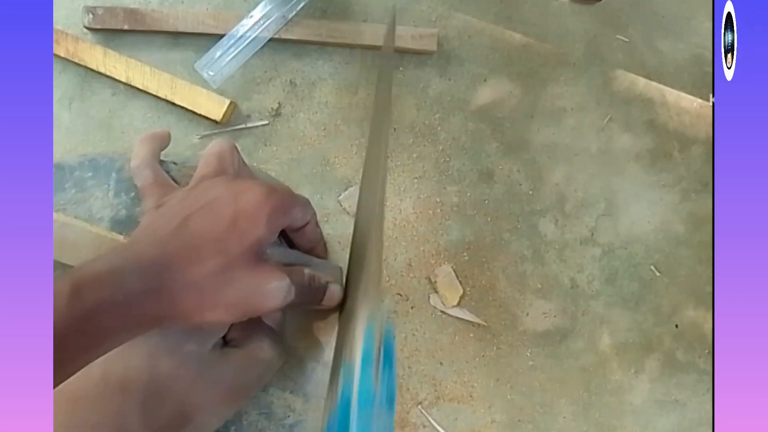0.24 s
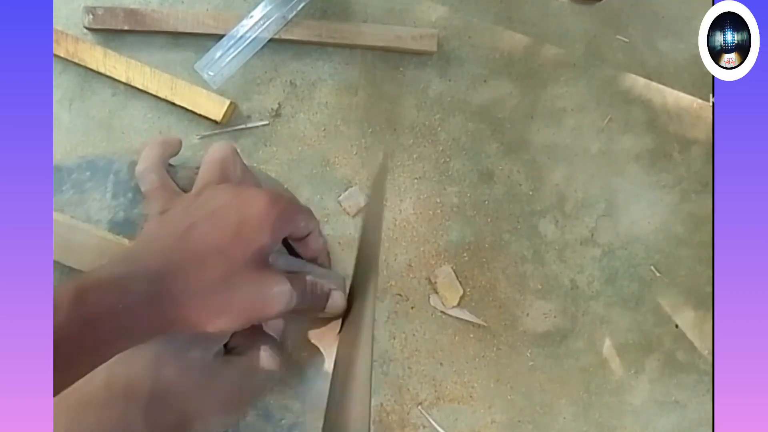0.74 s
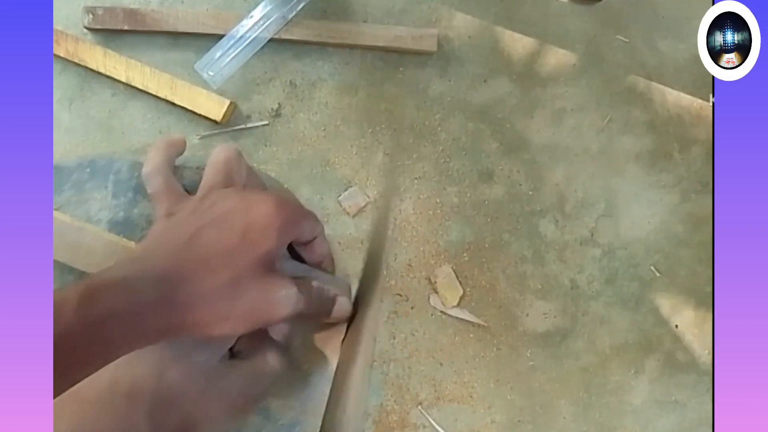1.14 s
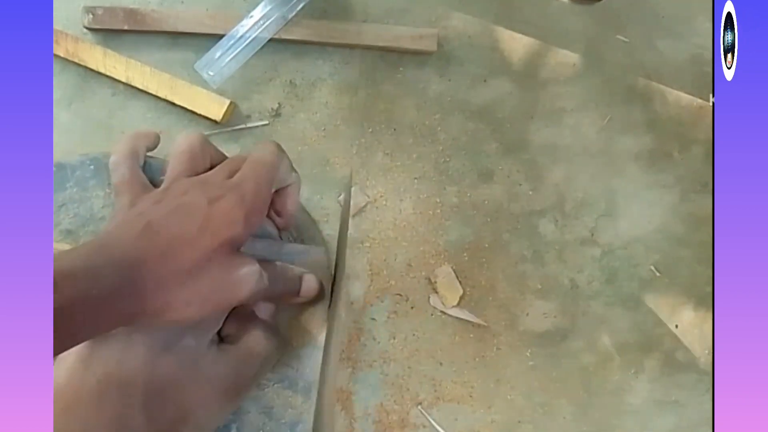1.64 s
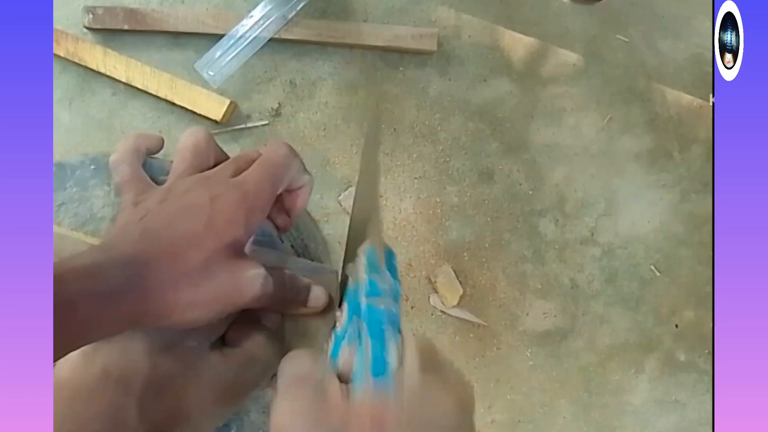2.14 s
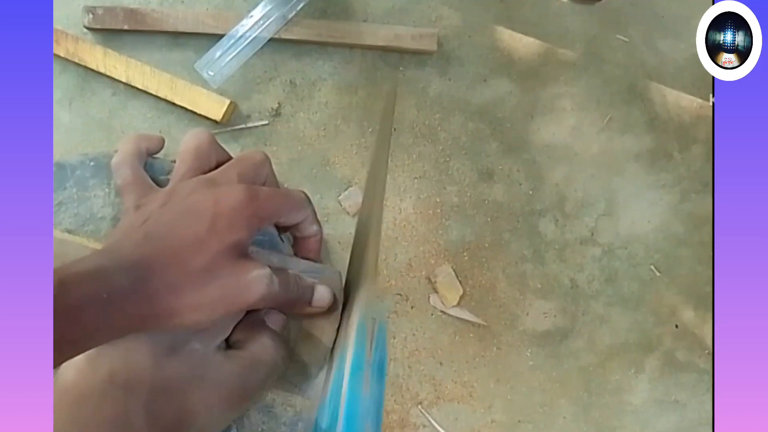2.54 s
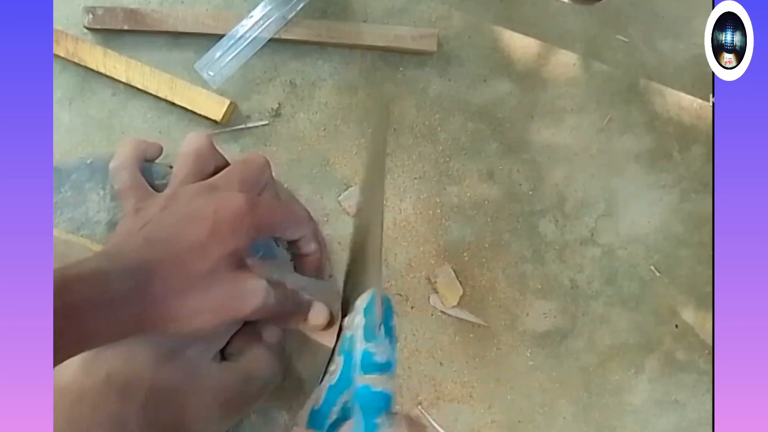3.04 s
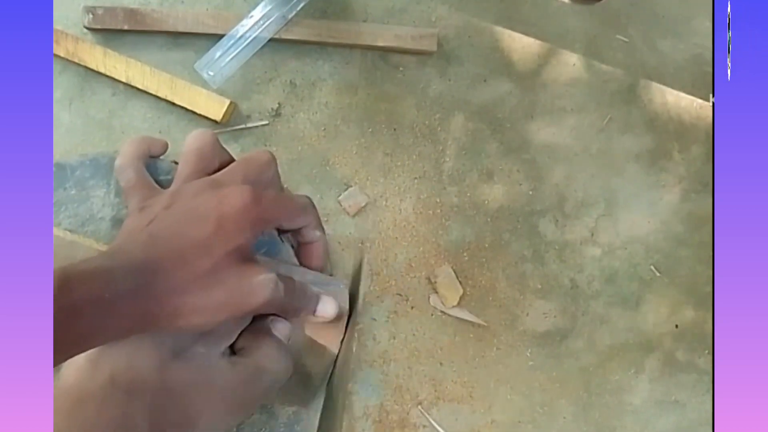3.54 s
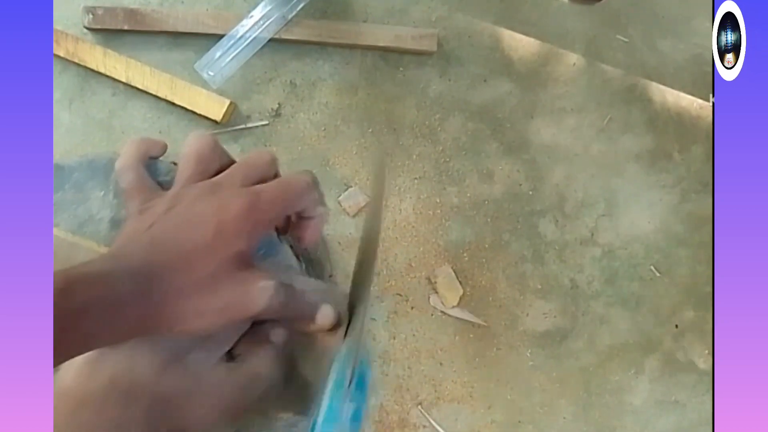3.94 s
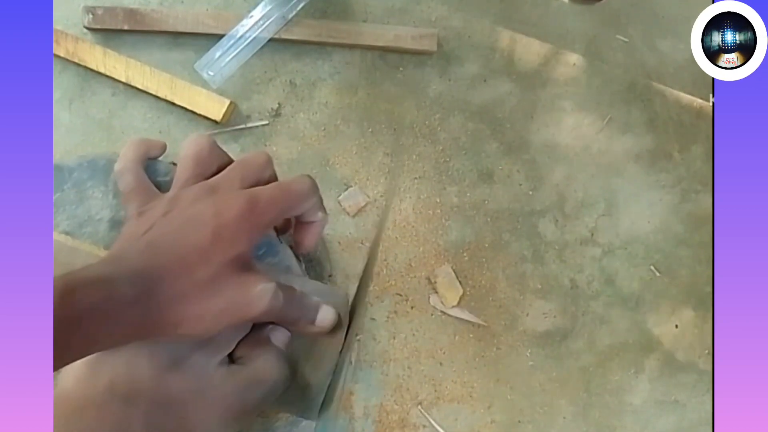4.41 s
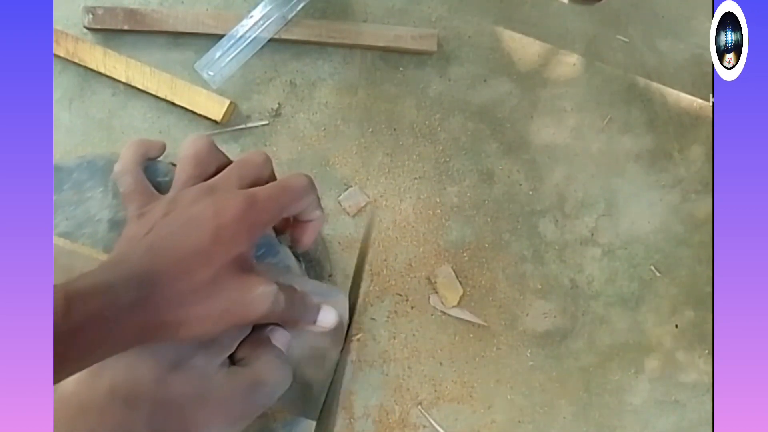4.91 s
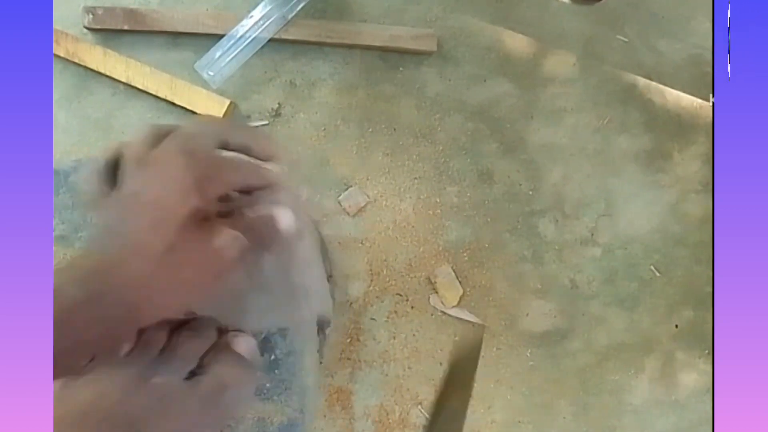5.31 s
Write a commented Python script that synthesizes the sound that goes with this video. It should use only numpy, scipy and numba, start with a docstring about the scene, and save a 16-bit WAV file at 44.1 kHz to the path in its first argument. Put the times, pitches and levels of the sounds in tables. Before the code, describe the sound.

A small hand saw cuts thin wood in quick rasping strokes with soft thumps, pausing once, then stopping with light ticks.

```python
"""Pull saw on thin wood

A small pull saw cuts wood held by hand on a concrete floor, about five double strokes a second.
The teeth bite on the pull and skate on the push: a train of impulses that forces the resonances
of the steel blade and the wood. At the turns the work rocks and thumps on the floor.
At the end the blade is lifted and the work is shifted."""
import sys
import numpy as np
from scipy import signal
from scipy.fft import rfft, irfft
from scipy.io import wavfile
from scipy.ndimage import uniform_filter1d
from numba import njit

SR = 44100
rng = np.random.default_rng(int(sys.argv[2]) if len(sys.argv) > 2 else 0)


def wrap_up_sound(samples):
    """Save the sound to the file named by the first command line argument, as 16-bit audio."""
    columns = np.atleast_2d(samples).T
    # keep every value between -1 and 1, then stretch to whole-number steps
    tamed = np.clip(columns, -1, 1)
    steps = np.round(tamed * 32767).astype(np.int16)
    wavfile.write(sys.argv[1], SR, steps)


N = 245637
TIME = np.arange(N) / SR
SAWING_ENDS_S = 4.745
DEPTH = np.minimum(TIME / SAWING_ENDS_S, 1) ** 1.8   # kerf depth, 0-1: slow at first, then gaining

# biting strokes: (start [s], end [s], force level [dB])
PULLS = [(.071, .163, -25.5), (.265, .341, -26), (.477, 0.545, -28.5), (.676, 0.756, -22.5),
         (.891, .961, -27), (1.336, 1.417, -24.5), (1.545, 1.627, -26), (1.776, 1.848, -27.5),
         (1.977, 2.054, -22), (2.186, 2.263, -24), (2.410, 2.48, -25.5), (2.624, 2.7, -24.5),
         (2.840, 2.92, -27), (3.055, 3.14, -27), (3.263, 3.349, -24), (3.494, 3.573, -27),
         (3.721, 3.801, -23), (3.949, 4.023, -26), (4.176, 4.251, -29.5), (4.371, 4.453, -33.5),
         (4.569, 4.655, -27.5)]
# skating strokes, each rocking the work as it sets in: (start [s], force level [dB], thump level [dB])
PUSHES = [(0, -34.5, -50), (0.181, -30.5, -47), (0.381, -42, -33.5), (0.585, -34.5, -33.5),
          (0.793, -35, -28.5), (1.256, -27, -56.5), (1.461, -38, -41.5), (1.661, -44, -37),
          (1.882, -33, -30), (2.083, -41.5, -57), (2.309, -41.5, -35), (2.526, -32, -34), (2.745, -41, -39),
          (2.962, -40.5, -36.5), (3.163, -34, -48), (3.392, -42.5, -42), (3.619, -33, -30.5),
          (3.843, -40, -32), (4.072, -44.5, -41.5), (4.28, -43, -36), (4.488, -36, -37.5),
          (4.672, -35.5, -48.5)]
# spectrum of teeth skating over fibres: (frequency [Hz], relative level [dB])
PUSH_HISS = [(500, -4), (1000, 3.5), (2000, 5), (4000, 10), (5200, 5), (7300, 2.5), (8500, 0), (11000, -1),
             (12500, -1), (16000, -2)]


def saw_strokes(pulling, pushing):
    """Asymmetric cutting: the pull swells and glides upward, the push is flatter in level and pitch."""
    # spectrum of tearing fibres: (frequency [Hz], relative level [dB])
    pull_hiss = [(500, -24), (1000, -13), (2000, -5.5), (4000, 5.5), (5200, 5.5), (7300, 1.5), (8500, -3.5),
                 (11000, -5.5), (13000, -5), (16000, -12)]
    pull = sawing(pulling, pull_hiss, skew=.99, sooner=.1, glide=.17, echo_travel=-.22,
                  width_hz=680, blade_db=-2, swell=1.38, chatter_db=3, grab_db=1.5,
                  upper_hz=3706, upper_db=-8, bite_db=7, wood_db=-17.5, wood_swell=.44, rasp_lag=.62)
    push = sawing(pushing, PUSH_HISS, skew=1.35, sooner=.55, glide=-.0026, echo_travel=.087,
                  width_hz=720, blade_db=-1.53, swell=.55, chatter_db=2, grab_db=-2,
                  upper_hz=3106, upper_db=-30, bite_db=1.9, wood_db=-14, wood_swell=.75, rasp_lag=.35)
    return pull + push


def sawing(controls, hiss_spectrum, skew, sooner, glide, echo_travel, width_hz, blade_db, swell,
           chatter_db, grab_db, upper_hz, upper_db, bite_db, wood_db, wood_swell, rasp_lag):
    """Forced vibration: the teeth drive wood and blade, whose resonance slides with its free length."""
    progress, force, hz, effort_db = controls
    # a deeper kerf holds the teeth ready, so the stroke catches sooner
    speed = np.maximum(np.sin(np.pi * progress ** np.maximum(skew - sooner * DEPTH, .5)), 0)
    catches = tip_echo(teeth(speed), progress, echo_travel)
    centre_hz = hz * (1 + glide * (progress - .5))
    blade = resonate(resonate(catches, centre_hz, width_hz), centre_hz, 1.83 * width_hz)
    # friction in the kerf holds the swing steady, apart from a quick chatter
    blade = steadied(blade) * flicker(chatter_db, 180)
    blade *= from_db(blade_db + grab_db * (.5 - progress))   # grab_db > 0: the first teeth drive hardest
    # a deep kerf damps the blade's upper band, tears more fibres and leaves the wood ringing less
    upper = steadied(resonate(resonate(catches, upper_hz, 750), upper_hz, 1100))
    upper *= from_db(upper_db - 12.5 * DEPTH)
    hiss = from_db(-9 + 3 * DEPTH) * colour(catches, hiss_spectrum)
    wood = from_db(wood_db - 3 * DEPTH) * wood_ring(catches)
    # the teeth sink in as the stroke goes on, and the sound brightens
    sunk = from_db(bite_db * (np.sin(np.pi * progress ** 1.5) - 1.26))
    rasp = speed ** swell * sunk * (upper + hiss) + speed ** wood_swell * wood
    # extra effort goes mostly into the blade's swing; the rasp grows less
    return force * (speed ** swell * blade + from_db(-rasp_lag * effort_db) * rasp)


def teeth(speed, full_speed_teeth_per_s=1100, tear_s=.0018, fibre_strength=6.2):
    """Impulsive excitation: each passing tooth snaps free and briefly tears fibres."""
    passed = np.cumsum(full_speed_teeth_per_s * (.3 + .7 * speed) * np.exp(.25 * drift(200))) / SR
    catches = np.diff(np.floor(passed), prepend=0)
    tearing = signal.lfilter([1], [1, -np.exp(-1 / (tear_s * SR))], catches) * rng.standard_normal(N)
    snaps = catches * rng.standard_normal(N)
    force = (rms_one(tearing) + .33 * rms_one(snaps)) * flicker(1.5, 450)   # hard and soft grain
    force /= np.sqrt(uniform_filter1d(force ** 2, size=SR // 60) + 1e-6)
    return fibre_strength * np.tanh(force / fibre_strength)   # breaking fibres limit the force


def tip_echo(force, progress, travel, delay_s=.001903, reflection=.42):
    """Comb filtering: bending waves return from the blade's end along a path that changes as it slides."""
    delay = delay_s * (1 + travel * (progress - .5)) * np.exp(.1 * drift(3.28))
    return force + reflection * np.interp(TIME - delay, TIME, force)


def motion(strokes, blade_hz, hz_per_db, early_db, late_db, evening, pitch_scatter=.012):
    """Amplitude and frequency modulation by the arm: a harder stroke is higher and more even."""
    progress, force, effort_db = np.zeros((3, N))
    hz = np.full(N, float(blade_hz))
    usual_db = np.mean([db for start, end, db in strokes])
    for (start, end, db), chance in zip(strokes, rng.standard_normal(len(strokes))):
        now = (TIME > start) & (TIME < end)
        progress[now] = (TIME[now] - start) / (end - start)
        effort_db[now] = db - usual_db
        lean_db = np.interp(progress[now], [.2, .5, .8], [early_db, 0, late_db])
        force[now] = from_db(db + lean_db * (1 - evening * effort_db[now]))
        hz[now] = (blade_hz + hz_per_db * effort_db[now]) * (1 + pitch_scatter * chance)
    return progress, force, hz, effort_db


def push_strokes(rest_s=.003):
    """Reciprocating motion: pushes fill the gaps between pulls; (start [s], end [s], level [dB])."""
    turns = [start - rest_s for start, end, db in PULLS] + [SAWING_ENDS_S]
    return [(start, turn, db) for (start, db, thump_db), turn in zip(PUSHES, turns)]


def blade_ring(drive, damping):
    """Modal resonance of the steel: damping, as from the pinch of the kerf, shortens each decay."""
    # modes of the free blade: (frequency [Hz], gain [dB], 60 dB decay time [s])
    modes = [(1610, -1, .14), (3601, -5, .22), (4003, 0, .1), (2510, -12, .09), (2681, -11, .13),
             (2880, -12, .11), (3220, -12, .11), (4620, -5, .07), (4930, -1, .09), (5341, -3, .1),
             (5720, -6, .07), (6360, -8, .07), (7400, -2, .06), (11609, -8, .08)]
    return sum(from_db(db) * resonate(drive, hz, damping * np.log(1000) / (np.pi * t60))
               for hz, db, t60 in modes)


def wood_ring(drive):
    """Damped resonance: the held wood responds in a few broad bands; unit power."""
    # modes of the wood: (frequency [Hz], bandwidth [Hz], gain [dB])
    modes = [(311.6, 61.4, 8.5), (761, 170, 1), (1268, 260, 0), (1717, 380, 1)]
    return rms_one(sum(from_db(db) * resonate(drive, hz, width) for hz, width, db in modes))


def splinters():
    """Fracture: a snagged fibre gives way in a short, dull burst of noise."""
    # tearing splinters: (time [s], level [dB], decay time [s])
    snags = [(1.935, -36.5, 0.027), (2.603, -36, 0.033), (3.693, -30, 0.009), (3.697, -36, 0.015),
             (4.35, -41.5, 0.0074)]
    # (frequency [Hz], relative level [dB])
    spectrum = [(150, -16), (700, -12.5), (1600, -7.5), (3000, -13), (6000, -17), (15000, -28)]
    crunch = rng.standard_normal(N) * flicker(1.3, 500)
    return colour(crunch, spectrum) * sum(burst(*snag) for snag in snags)


def thumps(pitch_hz=276.7, hz_per_db=.5, pitch_scatter=.03, rise_s=.005, t60=.043):
    """Damped impact: the work lands softly under the hand; a harder landing is stiffer and higher."""
    # low thumps of the work, as the first pull bites and after the sawing ends: (time [s], level [dB])
    stray_thumps = [(.097, -33.5), (5.007, -52), (5.038, -61), (5.423, -49), (5.459, -57)]
    landings = [(start + .011, db) for start, force_db, db in PUSHES]
    edges = [(s - .028, db - 8.5) for s, db in landings[1:]]   # the other edge touches first, lightly
    bumps = landings + edges + stray_thumps
    t = TIME[:SR // 10]
    envelope = (1 - np.exp(-(t / rise_s) ** 2)) * from_db(-60 * t / t60)
    envelope /= envelope.max()
    out = np.zeros(N + SR)
    for (s, db), chance in zip(bumps, rng.standard_normal(len(bumps))):
        hz = (pitch_hz + hz_per_db * (db + 31)) * (1 + pitch_scatter * chance)
        start = max(int((s - rise_s / 2) * SR), 0)
        out[start:start + len(t)] += from_db(db) * envelope * np.sin(2 * np.pi * hz * t)
    return out[:N]


def taps(contact_s=.0001):
    """Impulse response: brief contacts set the wood ringing, high and short."""
    # small wooden taps: (time [s], relative level [dB])
    contacts = [(4.870, -40), (4.926, -61), (4.963, -53), (5.463, -65)]
    impulses = np.zeros(N)
    for s, db in contacts:
        impulses[int(s * SR)] += from_db(db)
    t = TIME[:SR // 20]
    pulse = t * np.exp(-t / contact_s)
    force = signal.fftconvolve(impulses, pulse / pulse.sum())[:N]
    return from_db(5.5) * resonate(ring(force, hz=660, t60=.0062), 690, 670)


def blade_touches():
    """Selective excitation: the loose blade ticks and squeaks; each contact point favours other modes."""
    # touches on the wood: (time [s], relative level [dB], decay time [s], favoured frequency [Hz])
    touches = [(1.008, -51, .002, 2980), (1.065, -64, 0.072, 2850), (4.963, -47.5, 0.0012, 3460),
               (4.979, -54.5, 0.026, 3560), (5.004, -52, 0.036, 3580), (5.025, -53, 0.022, 3080),
               (5.143, -66, .045, 3230), (5.154, -64.5, 0.085, 1630), (5.165, -68, 0.047, 2500),
               (5.254, -63.5, 0.039, 2380), (5.462, -59, 0.0033, 1200)]
    noise = rng.standard_normal(N)
    ticks = noise * sum(burst(s, db, min(decay, .003)) for s, db, decay, hz in touches)
    slides, squeaks = np.zeros((2, N))
    for s, db, decay, hz in touches:
        slide = noise * burst(s, db, decay)
        slides += slide
        squeaks += resonate(resonate(slide, hz, 150), hz, 500)
    scrapes = resonate(resonate(ticks + from_db(-12) * slides, 1400, 2300), 1500, 4600)
    steel = blade_ring(squeaks + from_db(-3) * ticks, damping=.96)
    return from_db(-1.5) * scrapes + from_db(4.5) * squeaks + from_db(8.5) * steel


def rubbing():
    """Sliding friction: the blade rubs faintly all through a run, then settles against the wood."""
    # runs with the blade in the kerf: (start [s], end [s])
    runs = [(0, 0.985), (1.232, 4.74)]
    steel = held(runs, rise_s=.02, fade_s=.012) * colour(rng.standard_normal(N), PUSH_HISS)
    wood = held(runs, rise_s=.02, fade_s=.032) * wood_ring(rng.standard_normal(N))
    return from_db(-64.5) * steel + from_db(-67) * wood


def room(x, t60, level_db):
    """Reverberation: floor and walls return a weak diffuse tail that decays exponentially."""
    t = TIME[:SR // 2]
    tail = rng.standard_normal(len(t)) * from_db(-60 * t / t60) * (t > .004)
    return from_db(level_db) * signal.fftconvolve(x, tail / np.sqrt(np.sum(tail ** 2)))[:N]


def background(push_force):
    """Structure-borne noise: pushes and handling jolt the floor, over a faint rumble and hush."""
    # the hands move the work about: (start [s], end [s])
    handling = [(1.23, 1.3), (4.961, 5.6)]
    # spectra of the rumble and of the hush: (frequency [Hz], relative level [dB])
    rumble_spectrum = [(20, 4.5), (60, 0.5), (130, -5), (220, -10.5), (400, -23), (800, -38.5), (3000, -68)]
    hush_spectrum = [(20, -5), (130, -14), (300, -11.5), (600, -24.5), (1500, -23.5), (4000, -32),
                     (16000, -42)]
    jolts = from_db(-44.5) * uniform_filter1d(push_force, size=SR // 12)
    jolts += from_db(-60.5) * held(handling, rise_s=.0049, fade_s=.05)
    hush = from_db(-79.5) * colour(rng.standard_normal(N), hush_spectrum)
    rumble = (jolts + from_db(-77)) * colour(rng.standard_normal(N), rumble_spectrum)
    return rumble + hush


def from_db(db):
    """Decibels to amplitude ratio."""
    return 10 ** (np.asarray(db) / 20)


def rms_one(x):
    """Normalisation to unit power."""
    return x / np.sqrt(np.mean(x ** 2) + 1e-20)


def steadied(x):
    """Division by the running RMS evens out slow swings of level."""
    return x / np.sqrt(uniform_filter1d(x ** 2, size=SR // 70) + 1e-9)


def drift(hz):
    """Low-passed noise: a random wander of unit power."""
    r = np.exp(-2 * np.pi * hz / SR)
    return rms_one(signal.lfilter([1], [1, -2 * r, r * r], rng.standard_normal(N + SR))[SR:])


def flicker(spread_db, hz):
    """Random amplitude modulation: a gain that wanders about 1."""
    return from_db(spread_db * np.clip(drift(hz), -2, 2))


def colour(x, spectrum):
    """Spectral shaping by (frequency [Hz], relative level [dB]) points; unit power."""
    hz, db = np.transpose(spectrum)
    bins = np.maximum(np.arange(N + 1) * SR / (2 * N), 1)
    gain = from_db(np.interp(np.log(bins), np.log(hz), db))
    return rms_one(irfft(rfft(x, 2 * N) * gain)[:N])


def ring(x, hz, t60):
    """Damped oscillator: a unit impulse starts a decaying sine of amplitude 1."""
    r, w = from_db(-60 / (t60 * SR)), 2 * np.pi * hz / SR
    return signal.lfilter([0, np.sin(w)], [1, -2 * r * np.cos(w), r * r], x + 1e-18)


def resonate(x, hz, width_hz):
    """Resonance with gain 1 at its fixed or moving centre."""
    return sweep(x, 2 * np.pi * hz / SR * np.ones(N), np.exp(-np.pi * width_hz / SR))


@njit
def sweep(x, angle, r):
    """Two-pole band-pass with pole radius r and a moving pole angle."""
    y = np.zeros(len(x))
    for i in range(2, len(x)):
        drive = (1 - r * r) / 2 * (x[i] - x[i - 2])
        y[i] = drive + 2 * r * np.cos(angle[i]) * y[i - 1] - r * r * y[i - 2]
    return y


def burst(s, db, decay_s):
    """Envelope that jumps up at time s and decays exponentially."""
    return from_db(db) * (TIME >= s) * np.exp(-np.maximum(TIME - s, 0) / decay_s)


def held(spans, rise_s, fade_s):
    """Envelope that rises to 1 in each span and decays exponentially after it."""
    return np.max([np.clip((TIME - start) / rise_s, 0, 1) * np.exp(-np.maximum(TIME - end, 0) / fade_s)
                   for start, end in spans], axis=0)


def scene():
    """Superposition of saw, work, room and background, heard from close by."""
    pulling = motion(PULLS, blade_hz=2792, hz_per_db=8.5, early_db=.96, late_db=4, evening=.01)
    pushing = motion(push_strokes(), blade_hz=2554, hz_per_db=9, early_db=4.5, late_db=3, evening=.079)
    saw = saw_strokes(pulling, pushing) + rubbing() + splinters()
    pinched_steel = from_db(-1.5) * blade_ring(saw, damping=2.8)
    free_steel = from_db(-27.5) * blade_ring(saw, damping=1)
    direct = saw + pinched_steel + free_steel + blade_touches() + thumps() + taps()
    return (direct + room(direct, t60=.16, level_db=-26) + background(push_force=pushing[1]))[None]


def record(dry):
    """Band limiting: a steep low-pass cuts the top, and a small constant offset is added."""
    low_pass = signal.ellip(12, .2, 80, 15450, fs=SR, output="sos")
    return signal.sosfilt(low_pass, dry) + .0024


dry = scene()
out = record(dry)
wrap_up_sound(out)
```